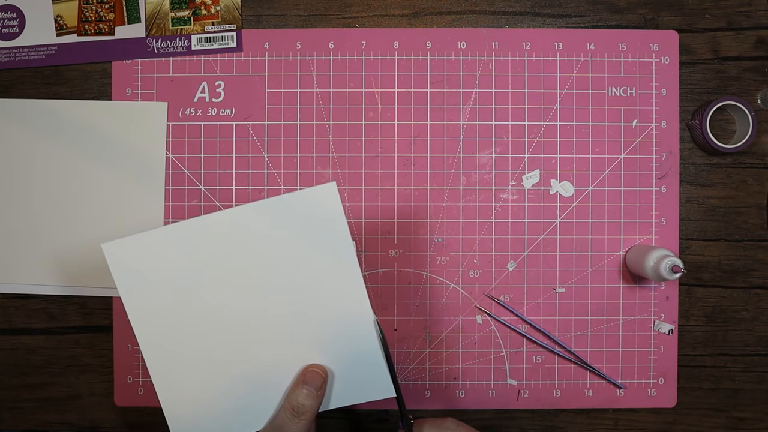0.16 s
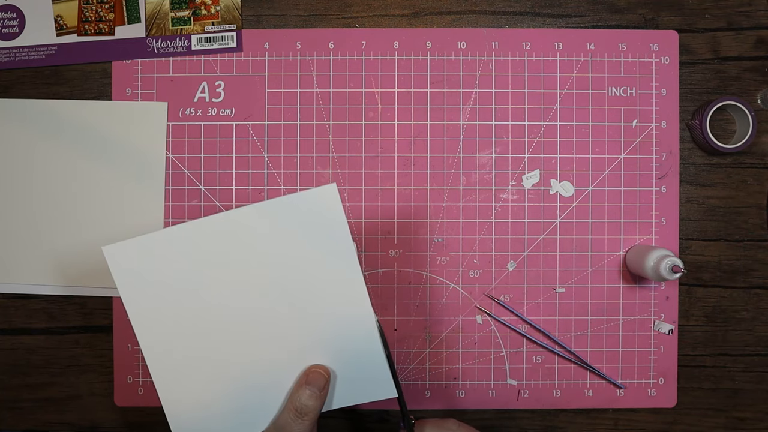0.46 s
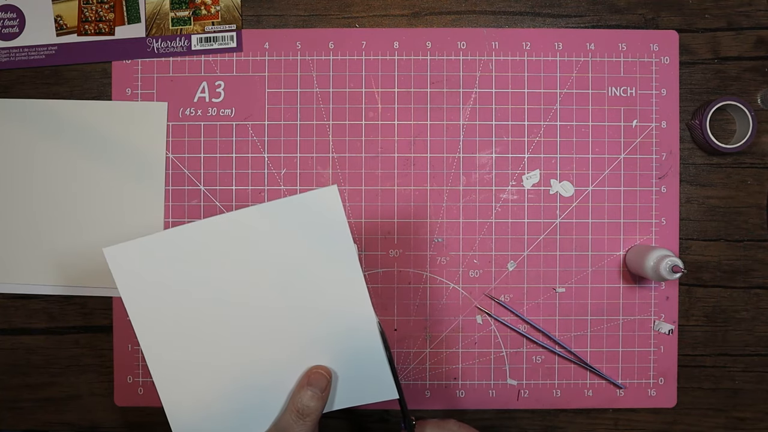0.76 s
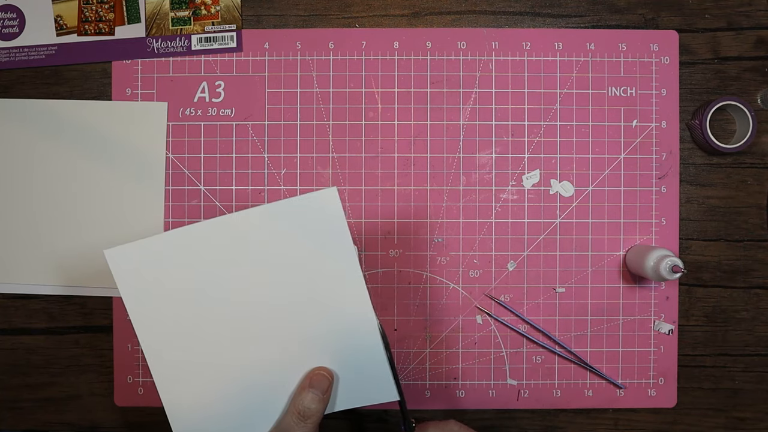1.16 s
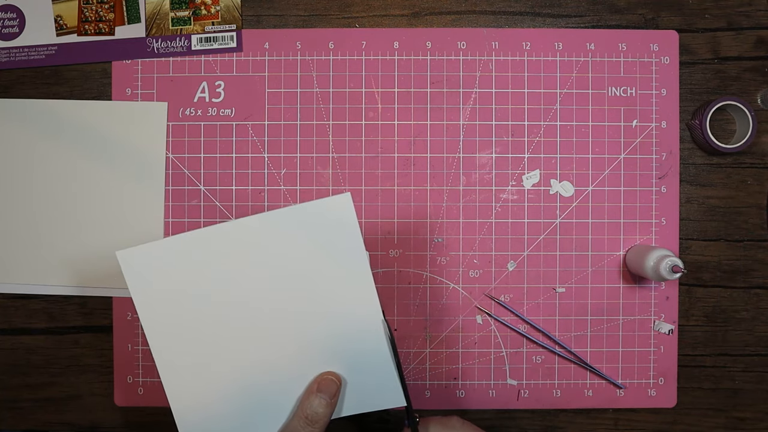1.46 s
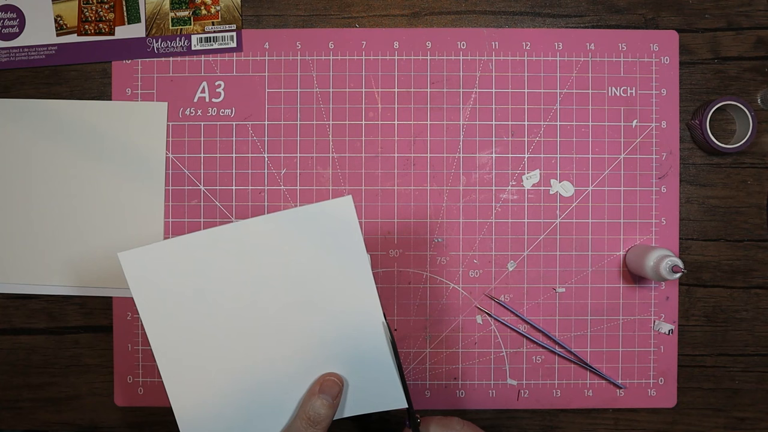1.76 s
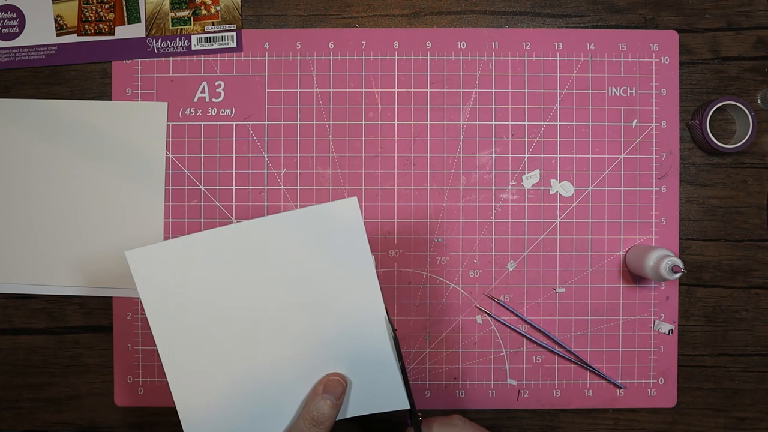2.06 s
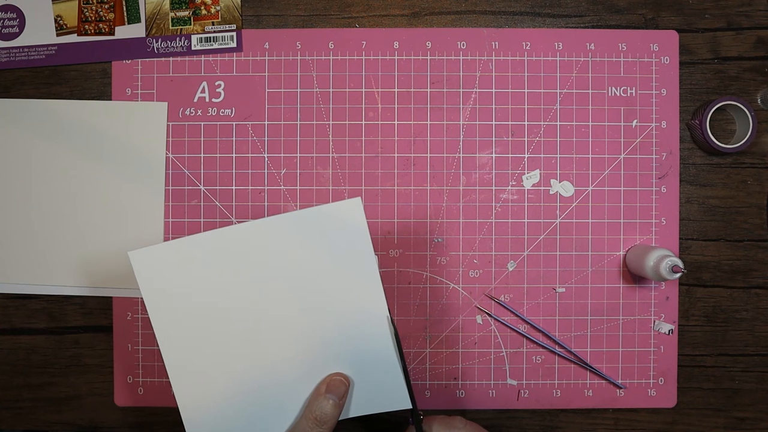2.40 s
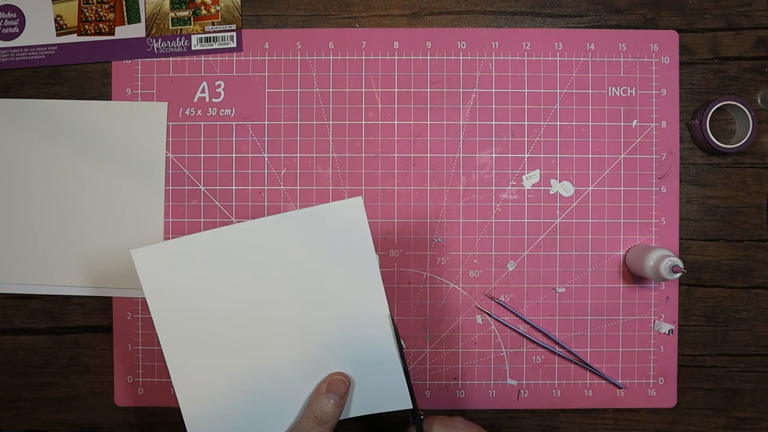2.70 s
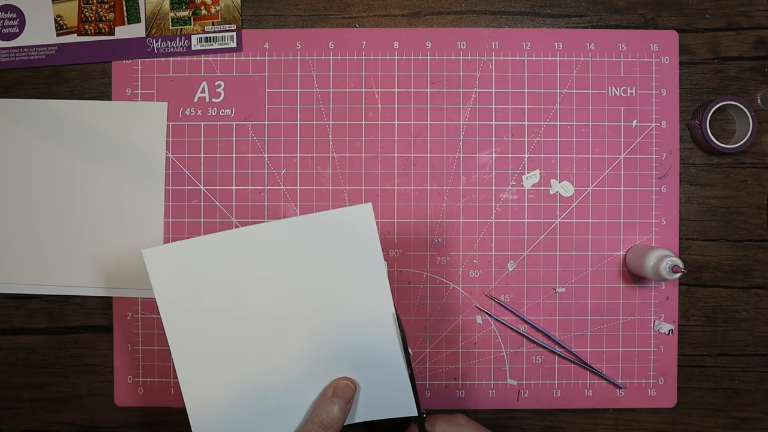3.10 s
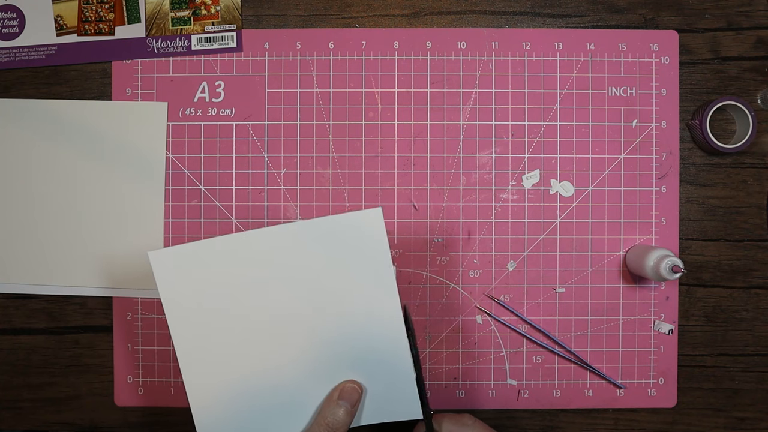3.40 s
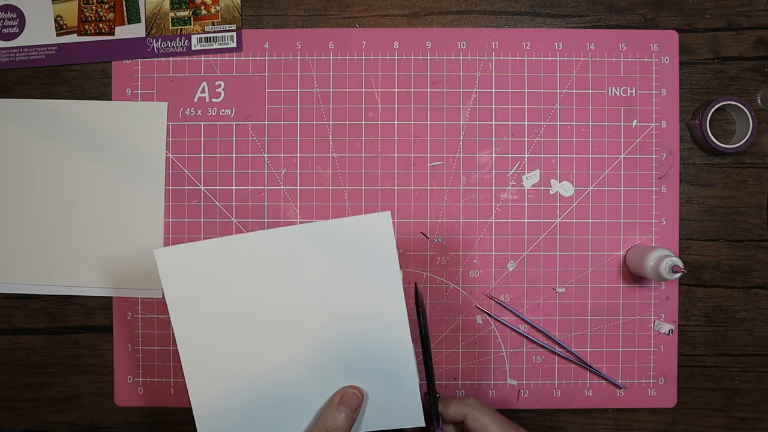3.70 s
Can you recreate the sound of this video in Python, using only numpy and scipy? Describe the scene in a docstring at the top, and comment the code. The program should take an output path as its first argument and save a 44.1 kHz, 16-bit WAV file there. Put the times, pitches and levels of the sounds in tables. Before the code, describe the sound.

Metal scissors cut stiff paper card with clicks, soft crunches and a sharp late snap shut.

```python
"""In a small room, scissors cut thick card in short strokes over a table.
The handles knock as damped modes over a noise thud; the steel blades tick as noise cracks with a ring.
Blades rub and crunch through the fibres as dense random snaps, and the card gives way in dry flicks.
Late on, the blades snap shut loudly enough to clip; soft room noise and a short tail surround it all."""
import sys
import numpy as np
from scipy import signal
from scipy.fft import rfft, irfft, next_fast_len
from scipy.io import wavfile

SR = 44100
rng = np.random.default_rng(int(sys.argv[2]) if len(sys.argv) > 2 else 0)


def bounce(signal):
    """Save signal as a 16-bit WAV file at the path given by the first command-line argument."""
    frames = np.transpose(np.atleast_2d(signal))
    limited = np.clip(frames, -1, 1)
    pcm = np.round(limited * 32767).astype(np.int16)
    wavfile.write(sys.argv[1], SR, pcm)


N = 169785
T = np.arange(SR // 10) / SR  # time within one contact, seconds
KNOCK_ATTACK_S, TICK_ATTACK_S = 0.00044, 0.00023
WALL_COUNT = 3

# likeness of left and right close to the scissors: f/Hz, correlation/-1..1
NEAR_ALIKE = [(500, 0.92), (2000, 0.41), (5000, 0.24), (10000, 0.067)]


def amp(db):
    """Decibels to gain."""
    return 10 ** (np.asarray(db) / 20)


def unit(x):
    """Scale to rms 1."""
    return x / np.sqrt(np.mean(x ** 2) + 1e-20)


def blow(x, window_s=0.0019):
    """Give a short sound the energy of an rms of 1 held for the level window."""
    return unit(x) * np.sqrt(window_s / T[-1])


def along(points, hz):
    """Read a curve of (f/Hz, value) points on a log frequency axis."""
    f, value = np.transpose(points)
    return np.interp(np.log(hz + 1), np.log(f + 1), value)


def filtered(x, response):
    """Multiply the spectrum of x by a response of frequency, padded against wrap-around."""
    n = x.shape[-1]
    padded = next_fast_len(n + 8192)
    hz = np.fft.rfftfreq(padded, 1 / SR)
    return irfft(rfft(x, padded) * response(hz), padded)[..., :n]


def stereo(pair, colour, alike, tilt_db=0):
    """Colour two unrelated signals and blend them as mid and side for the wanted left-right likeness."""
    def response(hz):
        turn = np.arccos(np.clip(along(alike, hz), -1, 1)) / 2
        slope_db = tilt_db * np.log2(np.maximum(hz, 1000) / 1000)  # per octave above 1 kHz
        return amp(along(colour, hz) + slope_db) * np.array([np.cos(turn), np.sin(turn)])
    mid, side = filtered(pair, response)
    return np.array([mid + side, mid - side])


def lagged(x, lag_s):
    """One sound reaches the two microphones at different times, the left one later."""
    halves = np.array([[-1], [1]])
    return filtered(x, lambda hz: np.exp(1j * np.pi * hz * lag_s * halves))


def panned(x, pan_db):
    """Make left louder than right by pan_db."""
    return x * amp(pan_db * np.array([[.5], [-.5]]))


def fade(t60, attack_s):
    """Envelope of a contact: a quick rise, then a fall of 60 dB in t60 seconds."""
    return np.exp(-np.log(1000) * T / t60) * (1 - np.exp(-T / attack_s))


def ring(modes, attack_s, scatter_db=2):
    """Sum damped modes, struck a little differently each time."""
    total = 0
    for k, (hz, db, t60) in enumerate(modes):
        gain = (-1) ** k * amp(db + scatter_db * rng.normal())
        phase = .5 * rng.normal()
        total = total + gain * fade(t60, attack_s) * np.sin(2 * np.pi * hz * T + phase)
    return blow(total)


def add(out, s, x):
    """Mix x into out at time s, cut off at the end."""
    part = out[:, round(s * SR):][:, :x.shape[-1]]
    part += x[..., :part.shape[1]]


def ambience():
    """Soft room noise, central in the bass and very wide in the hiss; its level drifts slightly."""
    # spectrum of the mid and, before widening, of the side: f/Hz, level/dB
    colour = [(15, -41.5), (25, -3.5), (54, -2.5), (191, -6.5), (301, -6), (326, -8.5), (394, -8),
              (543, -11), (1000, -13.5), (4800, -25), (6500, -30), (10300, -33.5), (12000, -45.5),
              (15000, -61)]
    # width of the noise: f/Hz, side against mid/dB
    width = [(60, -14.5), (130, -3), (290, 1.5), (640, 4.5), (3100, 5.5), (7000, 4.5), (12000, 11)]
    # slow course of the noise: t/s, level/dB
    course = [(0, -49.5), (3.35, -51), (3.501, -53.5), (3.85, -51)]
    level_db = np.interp(np.arange(N) / SR, *np.transpose(course))
    mid, side = filtered(rng.standard_normal((2, N)), lambda hz: amp(along(colour, hz)))
    side = filtered(side, lambda hz: amp(along(width, hz)))
    return amp(level_db) * unit(np.array([mid + side, mid - side]))


def room(x, count=3):
    """A short bright tail of decaying noise, slightly different as the scissors move on."""
    # decay of the tail: f/Hz, t60/s
    decay_times = [(150, .18), (800, 0.14), (2000, .18), (7000, 0.2), (13000, 0.19)]
    # spectrum of the tail: f/Hz, level/dB
    colour = [(100, -15.5), (300, -13), (600, -7), (900, -9), (1450, -16), (2200, -15), (3600, -7.5),
              (7000, -9.5), (10500, -4.5), (14000, -9.5)]
    # likeness of left and right in the tail: f/Hz, correlation/-1..1
    alike = [(500, 0.87), (2000, 0.7), (4000, -0.4), (7000, -0.48), (11000, -0.6)]
    delay_s, build_s = 0.0063, 0.00067
    out = np.zeros((2, N))
    for part in np.array_split(np.arange(N), count):
        hz, t, bins = signal.stft(rng.standard_normal((2, SR // 2)), SR, nperseg=256)
        decay = np.exp(-np.log(1000) * t / along(decay_times, hz)[:, None])
        decay = decay * (1 - np.exp(-t / build_s))
        tail = signal.istft(bins * decay, SR)[1]
        tail = stereo(tail / np.linalg.norm(tail[0]), colour, alike)
        # the left channel alone feeds the tail
        add(out, part[0] / SR + delay_s, signal.fftconvolve(x[:1, part], tail, axes=1))
    return out


def flicks():
    """The card gives way as a stroke ends: short papery noise cracks, strongest from 2 to 4.5 kHz."""
    # each flick: t/s, level/dB
    events = [(1.2675, -42), (2.0425, -42.5), (2.978, -50), (2.99, -43), (3.472, -39), (3.492, -43)]
    # spectrum of a flick: f/Hz, level/dB
    colour = [(100, -15), (900, -6), (1500, -13), (2100, 4.5), (2700, -7.5), (3400, -7), (4200, -2),
              (5500, -23), (15000, -34)]
    out = np.zeros((2, N))
    for s, db in events:
        noise = stereo(rng.standard_normal((2, len(T))), colour, NEAR_ALIKE)
        add(out, s, amp(db) * blow(noise * fade(.022, KNOCK_ATTACK_S)))
    return out


def handles():
    """Each knock rings hollow low modes and a group near 2 kHz over a short thud of hand and card."""
    # each knock: t/s, level/dB, hollow modes/dB, toneless thud/dB, left minus right/dB
    knocks = [(0.2506, -18, 4, -15, -2.5), (.4122, -42, 1, -1, 0), (0.4439, -17.5, -4, -7.5, -0.5),
              (1.2023, -41, -6, -8, -2), (2.014, -47, -6, -3, 0), (2.5152, -40.5, -3.5, -2, 0),
              (2.519, -36, -21, -18, -1), (2.9183, -38, -10, -6, 0), (3.3525, -20.5, -8, -6.5, -2.5),
              (3.356, -12, -2.5, -17.5, -1), (3.447, -37, -12, -5, -2)]
    # hollow low modes: f/Hz, level/dB, t60/s
    hollow_modes = [(472, -11, 0.06), (658, -6, 0.026), (803, -4, 0.022), (948, 2, 0.023), (1037, 3, 0.014)]
    # modes near 2 kHz: f/Hz, level/dB, t60/s
    handle_modes = [(1874, 0.5, 0.021), (2119, 1, 0.021), (2170, -1, 0.023), (2710, -14, 0.015)]
    # spectrum of the thud: f/Hz, level/dB
    thud_colour = [(60, -23.5), (170, -18), (300, -7), (1200, 3.5), (1500, -1.5), (2200, -5), (4000, -20),
                   (12000, -43.5)]
    out = np.zeros((2, N))
    for s, db, hollow_db, thud_db, pan_db in knocks:
        noise = filtered(rng.standard_normal(len(T)), lambda hz: amp(along(thud_colour, hz)))
        thud = blow(noise * fade(.016, KNOCK_ATTACK_S))
        knock = ring(handle_modes, KNOCK_ATTACK_S)
        knock = knock + amp(hollow_db) * ring(hollow_modes, KNOCK_ATTACK_S)
        knock = blow(knock + amp(thud_db) * thud)
        add(out, s, amp(db) * panned(lagged(knock, lag_s=4e-5), pan_db))
    return out


def strokes(rows, colour, snaps_per_s, spread_db=1):
    """Dense tiny snaps of uneven size for as long as the blades move."""
    attack_s, release_s = 0.0024, 0.025
    clump_db, clumps_per_s = 3, 450  # the blades catch and slip unevenly
    t = np.arange(N) / SR
    effort = np.zeros(N)
    for s, length, db, swell_db in rows:
        rise = np.clip((t - s) / attack_s, 0, 1)
        fall = np.clip(1 - (t - s - length) / release_s, 0, 1)
        progress = np.clip((t - s) / length, 0, 1)
        effort += rise * fall * amp(db + swell_db * (progress - 1.0))  # swells up to its level
    happens = rng.random(N) < snaps_per_s / SR
    snaps = happens * amp(spread_db * rng.standard_normal(N)) * rng.standard_normal((2, N))
    catch = np.interp(t * clumps_per_s, np.arange(N), rng.standard_normal(N))
    return effort * unit(stereo(snaps * amp(clump_db * catch), colour, NEAR_ALIKE))


def rubbing():
    """Steel blades rub along each other in a dense stream of tiny slips."""
    # each rub: start t/s, length/s, level/dB, swell over the stroke/dB
    rubs = [(.385, 0.031, -64, 4), (.432, 0.012, -34, 14), (1.19, 0.013, -51, 8), (1.71, 0.13, -56, 20),
            (2.355, 0.029, -51.5, 13), (2.41, 0.16, -65.5, -2.5), (2.509, 0.0052, -44, 15),
            (2.906, .026, -50, 2), (3.49, 0.0045, -50.5, 3), (3.542, 0.019, -54, 0)]
    # spectrum of the rub: f/Hz, level/dB
    steel_colour = [(100, -35), (500, -18), (2000, 1), (5500, -10), (7000, 7), (8500, -4), (10200, 1.5),
                    (12500, -8), (15500, -7)]
    return strokes(rubs, steel_colour, snaps_per_s=20000)


def shearing():
    """The blades crunch through the card, breaking fibre after fibre."""
    # each cut: start t/s, length/s, level/dB, swell over the stroke/dB
    cuts = [(1.205, 0.06, -52.5, -1.5), (2.012, 0.039, -52.5, -6.5), (2.932, 0.059, -44.5, 2.5),
            (3.447, 0.012, -41, -5)]
    # spectrum of the crunch: f/Hz, level/dB
    card_colour = [(60, -34), (300, 5), (1400, -2.5), (2000, 5.5), (2700, -1), (4700, 2), (5800, -4.5),
                   (7500, 2.5), (11000, -1), (12500, -7), (15500, -19)]
    return strokes(cuts, card_colour, snaps_per_s=22000)


def blades():
    """Each tick is a noise crack plus a hand-damped steel ring; the loud snap adds a low push."""
    # ticks of steel on steel and card: t/s, level/dB, t60/s, tilt/dB per octave, ring against crack/dB
    ticks = [(0.2503, -28.5, 0.018, -6, -41), (0.412, -41.5, 0.07, 0.5, -8), (0.4438, -20.5, .017, 2.5, -8),
             (1.2028, -35.5, 0.063, 3.5, -10), (1.725, -56, .02, 2, -8), (1.839, -50, 0.02, -1, -10),
             (2.002, -49, 0.046, 2, -14), (2.011, -44, 0.035, -4, -13), (2.385, -46.5, 0.057, 1, -9),
             (2.43, -48, 0.044, -2, -9), (2.516, -33, 0.027, -2, -5), (2.517, -35, 0.024, -0.5, -12),
             (2.9114, -36.5, 0.015, -0.5, -21), (2.933, -34.5, .028, 0.5, -10),
             (3.2048, -48, .02, 7.5, -18), (3.3527, -10.5, 0.021, -2.5, -7.5), (3.3562, 1, 0.011, 1.5, 4),
             (3.359, -8, 0.015, 1.5, 1), (3.446, -28, 0.046, 6, -13)]
    # spectrum of the crack: f/Hz, level/dB
    crack_colour = [(100, -21), (500, -7.5), (900, -4.5), (1450, -7.5), (2200, 0.5), (3100, 1.5),
                    (4100, -1.5), (5200, 3), (7000, -1.5), (8400, 1), (11000, -3.5), (12500, -8.5),
                    (15500, -19)]
    # blade modes: f/Hz
    mode_hz = [2330, 3310, 4330, 5140, 5630, 6035, 6330, 7060, 7395, 7945, 9305, 9682, 10175, 11000]
    # the same modes: level/dB
    mode_db = [-10, -11.5, -23, -17, -17, -9, 1, -1, -4.5, -5.5, -6, 0, -1.5, -5]
    snap_s, push_db, push_rise_s, push_pan_db = 3.3559, -15.5, 0.00043, -5
    out = np.zeros((2, N))
    modes = [(hz, db, .016) for hz, db in zip(mode_hz, mode_db)]  # one t60 in seconds for all
    for s, db, t60, tilt_db, ring_db in ticks:
        noise = stereo(rng.standard_normal((2, len(T))), crack_colour, NEAR_ALIKE, tilt_db)
        crack = blow(noise * fade(t60, TICK_ATTACK_S))
        steel = lagged(ring(modes, TICK_ATTACK_S), lag_s=1.7e-5)
        add(out, s, amp(db) * blow(crack + amp(ring_db) * steel))
    u = T / push_rise_s
    push = amp(push_db) * u * np.exp(1 - u)
    add(out, snap_s, panned(push, push_pan_db))
    return out


def scissors():
    """All contacts of the scissors with themselves, the hand and the card, drawn afresh at each call."""
    return handles() + blades() + flicks() + shearing() + rubbing()


def scene():
    """Scissors above the table; they radiate a different mix of their modes towards each wall."""
    table_delay_s, table_db = .0026, -14  # first reflection, off the table top
    direct = scissors()
    to_walls = [scissors() for _ in range(WALL_COUNT)]
    tails = sum(room(x) for x in to_walls) / np.sqrt(WALL_COUNT)
    out = direct + tails + ambience()
    add(out, table_delay_s, amp(table_db) * direct)
    return out


def limiter(x):
    """Peaks in either channel pull both gains down; the gain recovers at a steady rate, smoothed."""
    limit_db, attack_s, release_db_per_s = 0.5, 0.0011, 167
    peak_db = 20 * np.log10(np.abs(x).max(axis=0) + 1e-9)
    over_db = np.maximum(peak_db - limit_db, 0)
    recovery_db = release_db_per_s * np.arange(N) / SR
    cut_db = np.maximum.accumulate(over_db + recovery_db) - recovery_db
    keep = np.exp(-1 / (attack_s * SR))
    return x * amp(-signal.lfilter([1 - keep], [1, -keep], cut_db))


def record(dry):
    """Microphone roll-off, a limiter too slow for the snap, clipping and the band limit."""
    # microphone response: f/Hz, level/dB
    microphone = [(5500, 2), (11300, -2), (12300, -5), (15000, -9)]
    clip_db, top_hz = -1, 15800
    held = limiter(filtered(dry, lambda hz: amp(along(microphone, hz))))
    clipped = np.clip(held, -amp(clip_db), amp(clip_db))
    return filtered(clipped, lambda hz: 1 / (1 + (hz / top_hz) ** 100))


dry = scene()
out = record(dry)
bounce(out)
```